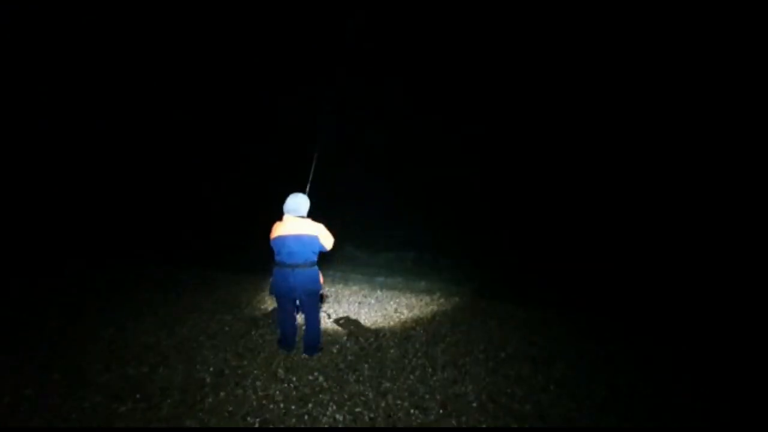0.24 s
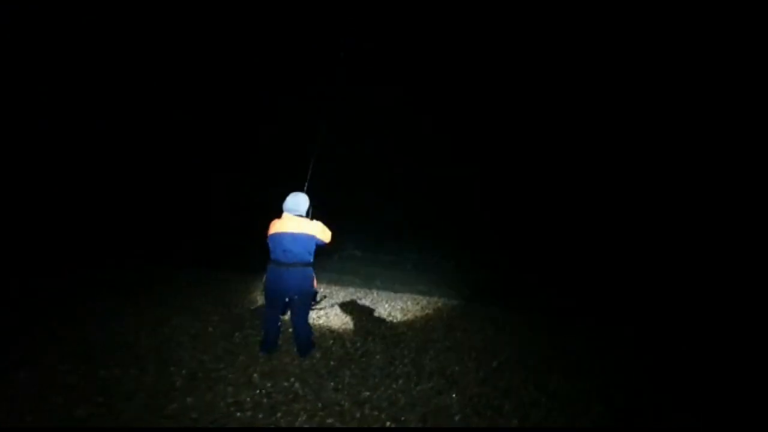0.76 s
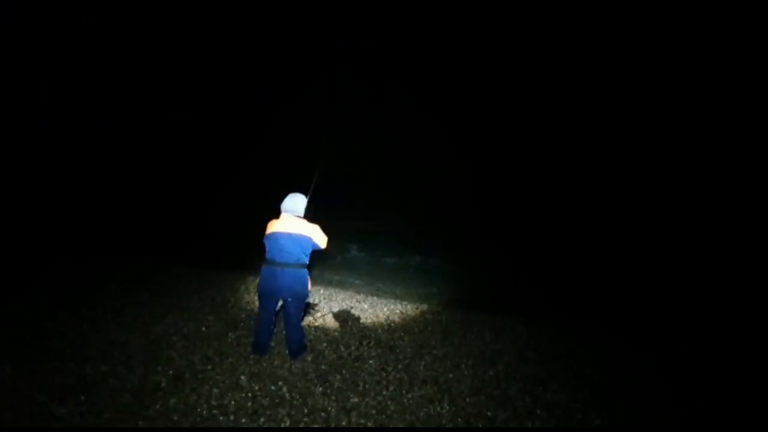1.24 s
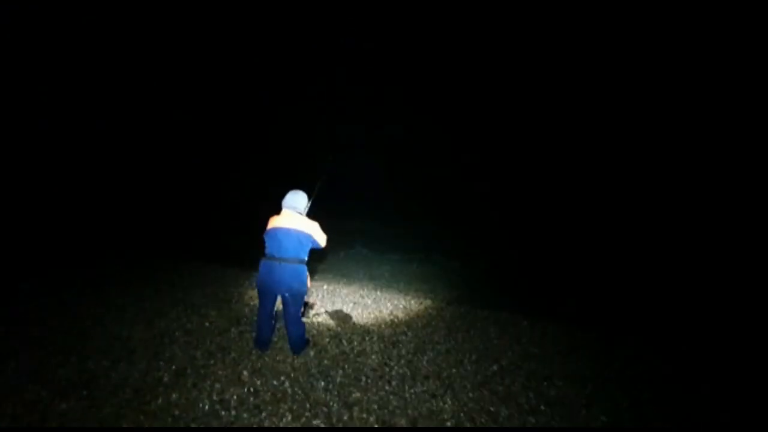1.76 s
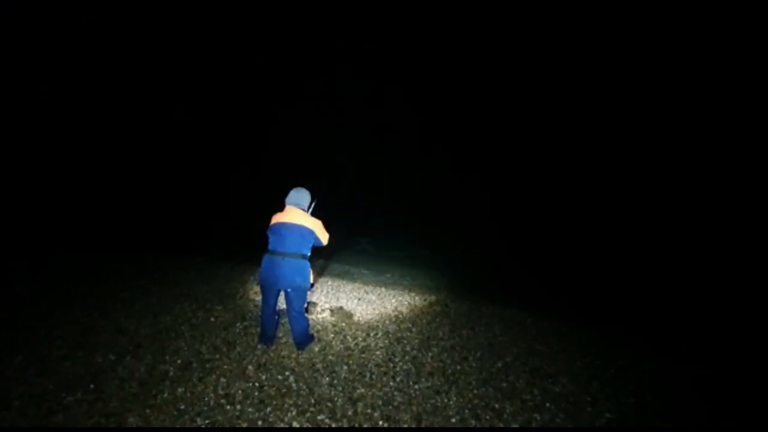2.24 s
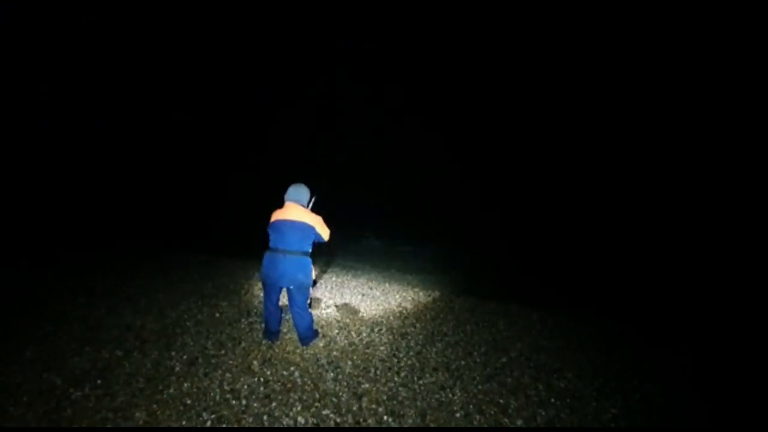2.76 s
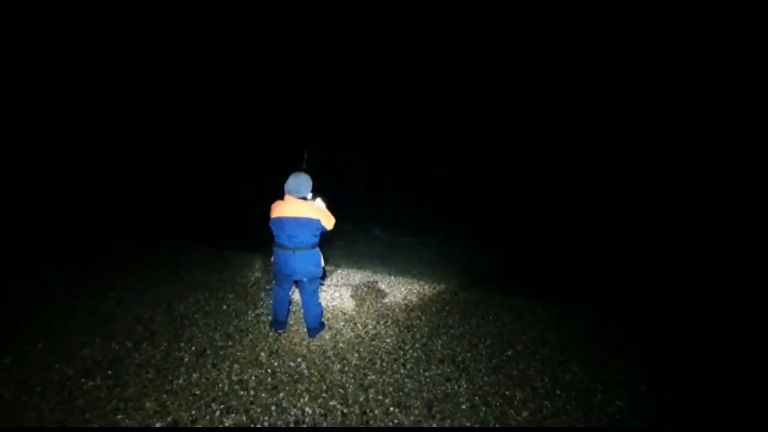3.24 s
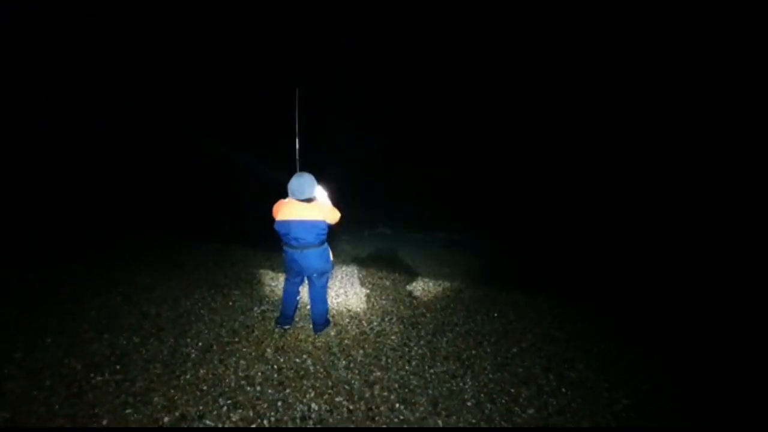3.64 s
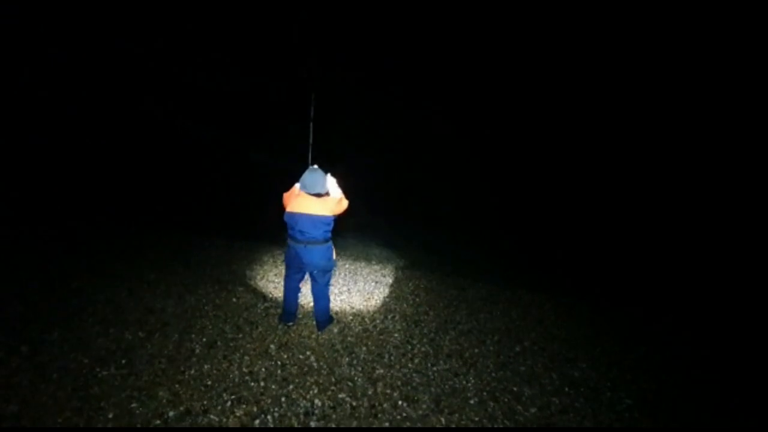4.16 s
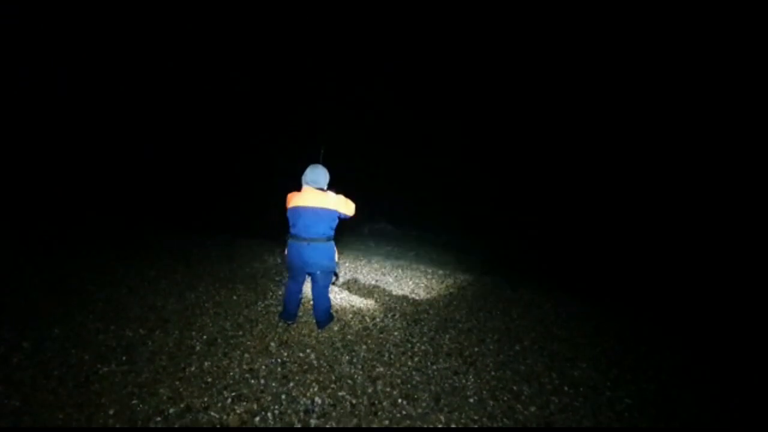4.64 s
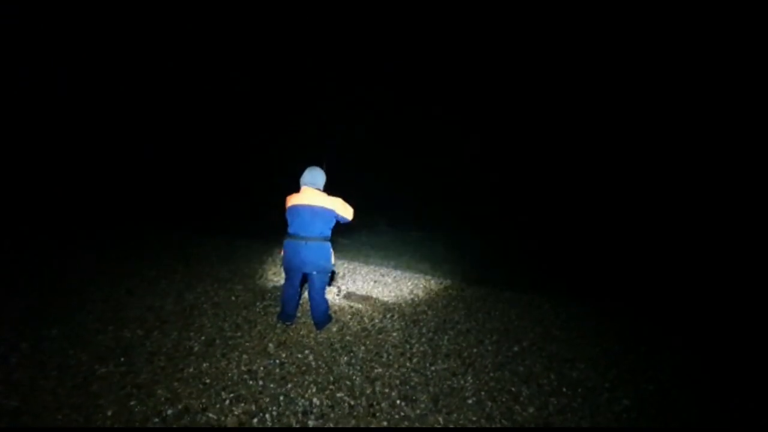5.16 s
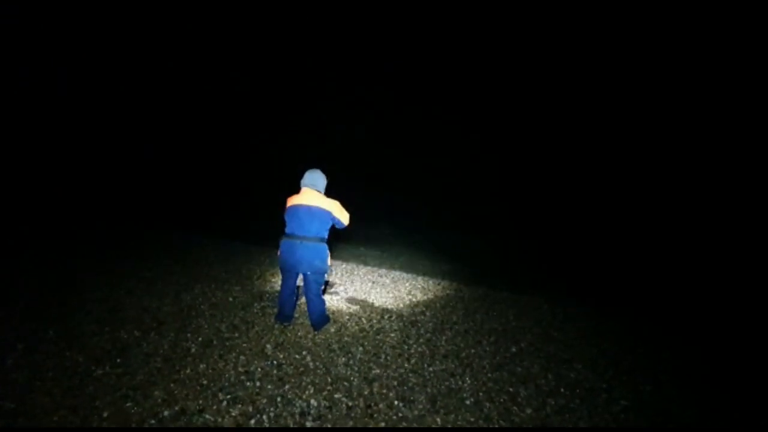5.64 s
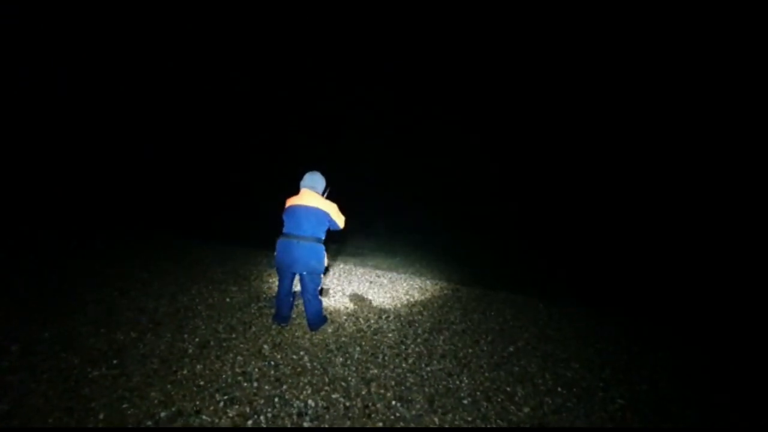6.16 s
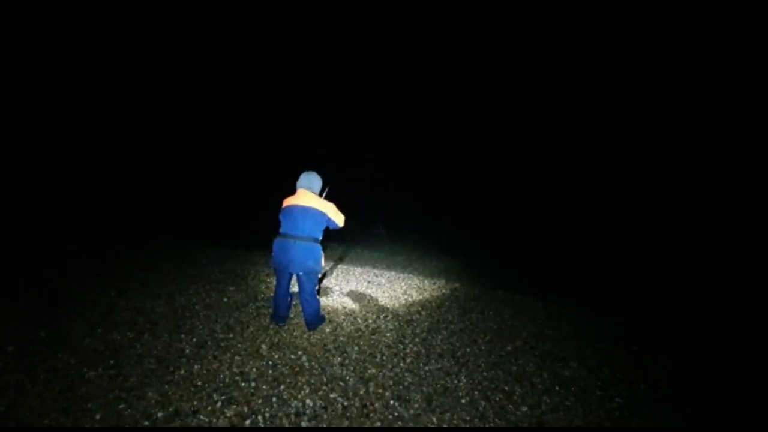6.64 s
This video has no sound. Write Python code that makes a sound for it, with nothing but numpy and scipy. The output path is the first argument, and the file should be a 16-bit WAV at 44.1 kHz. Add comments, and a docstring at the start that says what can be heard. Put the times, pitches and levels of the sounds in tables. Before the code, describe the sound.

Waves break and drain on a pebble beach, after a waterproof sleeve rustles against the microphone and wind gusts buffet it.

```python
"""Waves break here and there along a shingle beach at night, run up the pebbles and drain back.
Turbulent water roars and splashes, colliding stones rattle, foam fizzes and trapped air booms.
At first a waterproof sleeve rubs and crackles on the camera by stick-slip friction, and the camera
body is knocked once; then gusts of wind buffet it. Two microphone ports, each with its own
resonances, hear the surf with a time lag that follows the break along the shore."""
import sys
import numpy as np
from scipy import signal
from scipy.fft import rfft, irfft, next_fast_len
from scipy.io import wavfile
from scipy.ndimage import uniform_filter1d

SR = 44100
rng = np.random.default_rng(int(sys.argv[2]) if len(sys.argv) > 2 else 0)


def digitize_waveform(pressure):
    """Quantize a signal to 16-bit integers and store it at the path in sys.argv[1].

    Rows of a 2-D input are taken as channels; values are limited to [-1, 1].
    """
    field = np.atleast_2d(pressure).T
    bounded = np.clip(field, -1, 1)
    quanta = np.round(bounded * 32767).astype(np.int16)
    wavfile.write(sys.argv[1], SR, quanta)


N = 304290
T = np.arange(N) / SR
PORT_LAG_S = 0.00049  # delay between the ports for a sound fully to one side
BANK_BEARING = -0.88  # the pebble bank that the water drains through

# Where the wave breaks. Each row: time in seconds, bearing (-1 left, 1 right), spread in bearing.
BREAK_PATH = [(1.5, 0.54, 0.43), (2.3, 0.87, 0.28), (3.8, 0.98, 0.19), (4.1, -.92, 0.45),
              (4.68, -0.75, 0.51), (4.92, -0.13, 0.56), (5.4, -0.52, 0.2), (6.25, -0.48, 0.21),
              (6.42, 0.99, .26)]
# Spectra of the four surf layers. Each row: frequency in Hz, relative spectral density in dB.
ROAR_SPECTRUM = [(30, -15), (70, -1.5), (115, -7), (190, -0.5), (300, 0.5), (450, -2), (700, -1.5),
                 (1000, -21), (2000, -34)]
SPLASH_SPECTRUM = [(500, -9.5), (850, -3), (1050, -0.5), (1350, 2.5), (1700, -5), (3000, -20), (6000, -43)]
PEBBLE_SPECTRUM = [(1000, -26), (1600, -4.5), (2000, 4), (2500, 0), (3300, -1.5), (5000, -8.5),
                   (7000, -13.5), (14000, -44)]
FIZZ_SPECTRUM = [(1500, -0.5), (3000, 0), (4500, 2), (6500, 1.5), (9000, -2), (12000, -1), (16000, 0.5)]

def surf():
    """Turbulence, colliding stones and bursting bubbles: many random events sum to broadband noise."""
    roar_db, splash_db, pebble_db, fizz_db = wave_levels()
    bearing, spread = curves(BREAK_PATH)
    # the deep roar comes from a wider stretch than the splash
    breaker = shore(0.84 * bearing, 1.85 * spread, far_db=-5.5, churn_db=3, churn_hz=14)
    roar = unit(colour(breaker, ROAR_SPECTRUM)) * undb(roar_db)
    swash = shore(bearing, spread, far_db=-11, churn_db=1, churn_hz=22)
    splash = unit(colour(swash, SPLASH_SPECTRUM)) * undb(splash_db)
    stones = shore(bearing, 0.63, far_db=-9, churn_db=2, churn_hz=35)
    stones += grains(per_s=2500, spread_db=3)  # near stones click singly
    pebbles = unit(colour(stones, PEBBLE_SPECTRUM)) * undb(pebble_db)
    bubbles = shore(BANK_BEARING, 0.1, far_db=-8, churn_db=5.5, churn_hz=36)
    bubbles += undb(0.5) * grains(per_s=7000, spread_db=3)
    foam = unit(colour(bubbles, FIZZ_SPECTRUM)) * undb(fizz_db)
    shield_db = np.interp(T, [1.56, 1.68], [-8, 0])  # the sleeve covers the ports, then slides off
    return undb(shield_db) * (roar + splash + pebbles + foam)


# Breaking waves. Each row: crest time in seconds, run-up length in seconds, build rate in dB per
# second, then the levels of roar, splash, pebbles and fizz in dB.
WAVES = [(1.67, 0.11, 57, -46.5, -43, -44.5, -43.5), (1.996, 0.33, 32, -53, -57, -48.3, -50),
         (2.604, 0.28, 33, -50.5, -55.5, -53, -58), (3.04, 0.32, 33, -46.5, -50.5, -54.5, -60),
         (4.16, 0.47, 42, -45, -47.5, -53, -48), (4.557, 0.12, 58, -44, -48, -49, -46),
         (4.836, 0.5, 107, -42.5, -40, -42, -39), (5.76, 0.09, 53, -47, -44.5, -48.5, -41.5),
         (6.4, 0.13, 294, -51, -53.5, -54, -47), (6.66, 0.096, 43, -48, -45.5, -44.5, -57)]
# The steady far surf: levels of roar, splash, pebbles and fizz in dB.
FAR_SURF_DB = (-53, -56, -55.5, -58.5)

def wave_levels():
    """Exponential growth and decay: each wave swells over the far surf. Gives four levels in dB."""
    crests, lengths, builds, *layers = np.transpose(WAVES)
    water, foam = [], []
    for crest, length, build in zip(crests, lengths, builds):
        water.append(swell(crest, length, build, fall_db_s=19, sag_db_s=4))
        # foam gathers more slowly than the water breaks, and bursts sooner
        foam.append(swell(crest, length, 0.35 * build, fall_db_s=31, sag_db_s=4))
    return [power_sum(far_db, peaks_db, shapes)
            for far_db, peaks_db, shapes in zip(FAR_SURF_DB, layers, (water, water, water, foam))]


def shore(bearing, spread, far_db, churn_db, churn_hz, stretches=7):
    """An incoherent line source: each stretch churns alone, and its path difference sets its lag."""
    out, power = np.zeros((2, N)), 0
    angles = np.pi * ((np.arange(stretches) + 0.5) / stretches - 0.5)
    for place in np.sin(angles):
        far_ends = undb(far_db) * place ** 4  # the rest of the long beach crowds into the two ends
        weight = np.exp(-((place - bearing) / spread) ** 2) + far_ends
        water = weight * undb(churn_db * walk(churn_hz)) * rng.standard_normal(N)
        out += arrive_from(place, water)
        power = power + weight ** 2
    return unit(out / np.sqrt(power))


# Air pockets under curling waves. Each row: peak time in seconds, level in dB, half length in
# seconds, pitch in Hz.
AIR_POCKETS = [(2.356, -45, 0.016, 230), (2.417, -46.5, 0.023, 290), (2.55, -45, 0.027, 291),
               (4.827, -43.5, 0.034, 298.4), (6.402, -46, 0.011, 222.4)]

def plunges():
    """Bubble resonance: each trapped air pocket pulsates in a short boom of wavering pitch."""
    out = np.zeros(N)
    for peak_s, db, half_s, hz in AIR_POCKETS:
        pitch_hz = hz * (1 + 0.11 * walk(60))
        phase = 2 * np.pi * np.cumsum(pitch_hz) / SR
        envelope = np.exp(-0.5 * ((T - peak_s) / half_s) ** 2)
        out += undb(db) * np.sqrt(2) * np.sin(phase) * envelope
    return out


# Water sucking back through the stones. Each row: time in seconds, level in dB.
BACKWASH_LEVELS = [(1.9, -59), (3.7, -60), (4.3, -53), (5.2, -75), (6.33, -66), (6.46, -50), (6.7, -45),
                   (6.9, -42)]
# Its hollow ring. Each row: frequency in Hz, relative spectral density in dB.
BACKWASH_SPECTRUM = [(1200, -26), (1700, -5), (1880, -1.5), (2080, -1), (2300, -22), (2900, -8),
                     (4000, -35)]

def backwash():
    """Impact noise: draining water drags stones of like size, so the rattle gathers round one pitch."""
    level_db, = curves(BACKWASH_LEVELS)
    impacts = grains(per_s=5000, spread_db=-1.5, channels=1)[0]
    rattle = unit(colour(impacts, BACKWASH_SPECTRUM)) * undb(level_db)
    return arrive_from(BANK_BEARING, rattle)


# Spectra of the three sleeve layers. Each row: frequency in Hz, relative spectral density in dB.
RUB_SPECTRUM = [(40, -18), (150, -6), (350, -3), (600, -3.5), (1100, -8), (1800, -9.5), (3000, -1),
                (6000, -18)]
SWISH_SPECTRUM = [(1000, -31), (2000, -11), (3000, -1), (4000, -3.5), (5000, -6), (7000, -9),
                  (14000, -56.5)]
HISS_SPECTRUM = [(3000, -26), (6000, 0.5), (8000, 4.5), (10000, 3), (13000, -0.5), (16000, -0.5)]

def sleeve():
    """Stick-slip friction: the body carries the rub to both ports, and each hears its own threads."""
    rub_db, swish_db, hiss_db = stroke_levels()
    contact = np.interp(T, [1.62, 1.85], [1, 0])
    catch = walk(110)
    rub = unit(colour(rng.standard_normal(N), RUB_SPECTRUM)) * undb(rub_db + 1.23 * catch)
    # fast sliding blends into a swish; as it slows, single crinkles stand out
    slowness = np.clip((-28.5 - swish_db) / 18, 0.1, 0.9)
    threads = grains(per_s=16000, spread_db=1) * np.sqrt(1 - slowness)
    threads += crinkles(per_s=690, spread_db=2.5, decay_s=0.00091) * np.sqrt(slowness)
    through_body = 0.24 * rng.standard_normal(N)
    swish = unit(colour(threads + through_body, SWISH_SPECTRUM)) * undb(swish_db + 1.25 * catch)
    hiss = unit(colour(threads, HISS_SPECTRUM)) * undb(hiss_db + 2 * catch)
    return contact * (rub + swish + hiss)


# Strokes of the sleeve. Each row: start and length in seconds, then rub, swish and hiss levels in dB.
STROKES = [(0.0, 0.098, -29.5, -23, -26.5), (0.123, 0.028, -27, -22, -22.5),
           (0.304, 0.022, -39, -44, -26.5), (0.403, 0.029, -39, -28.5, -22.5),
           (0.484, .015, -41, -42, -28.5), (0.543, 0.12, -35.5, -35.5, -41), (0.737, 0.17, -32, -32.2, -35),
           (.955, 0.052, -40.5, -41.5, -36.5), (1.067, 0.05, -44.5, -38.5, -31),
           (1.159, 0.13, -41.5, -43, -38), (1.63, 0.059, -43, -42.5, -40)]

def stroke_levels(creep_db=(-34.5, -33, -30.5), settle_db_s=8.5):
    """Relaxation: rub, swish and hiss, in dB, jump with each stroke over the cloth's fading creep."""
    starts, lengths, *layers = np.transpose(STROKES)
    shapes = [swell(s, length, rise_db_s=245, fall_db_s=335) for s, length in zip(starts, lengths)]
    return [power_sum(first_db - settle_db_s * T, peaks_db, shapes)
            for first_db, peaks_db in zip(creep_db, layers)]


def crinkles(per_s, spread_db, decay_s):
    """Each crease that gives way releases elastic energy as an exponentially decaying noise burst."""
    releases = grains(per_s, spread_db, channels=1) ** 2
    energy = signal.lfilter([1], [1, -np.exp(-1 / (decay_s * SR))], releases)
    return unit(np.sqrt(energy) * rng.standard_normal((2, N)))


# Snapping creases and small ticks. Each row: start in seconds, peak level in dB, left minus right
# in dB, centre frequency in Hz.
SNAPS = [(.2957, -12, -3, 11000), (0.33, -11, .5, 5000), (0.415, -11, 2, 13000), (.993, -5.5, 2, 12100),
         (1.0947, -9, 8, 12000), (1.099, -13, 10, 10000), (1.185, -15, 7, 9000), (1.208, -18.5, 12, 3580),
         (1.225, -18, 2, 9000), (1.2655, -13, 1, 10500), (1.293, -17, 10, 7000), (1.341, -22, 19, 4000),
         (1.3747, -18, 6, 3760), (1.424, -17, -5, 12000), (1.433, -9.5, 12, 3600), (1.4555, -28, 1, 8000),
         (1.4822, -20, 3, 4500), (1.4873, -12.5, 0, 12200), (1.528, -11.5, 0, 9800),
         (1.6172, -14, -7, 7500), (1.8362, -9.5, -3, 9600), (1.935, -17.5, -1.5, 8000),
         (3.552, -37, -5, 10000), (4.134, -29, -11, 10000), (5.735, -27.5, 0, 10000)]

def snaps(rise_s=0.00033, decay_s=0.00058, tail_s=0.0031, tail_db=-19, octaves=0.76, size=1024):
    """Buckling: a crease snaps with a sharp crack and a short tail, in a band set by its size."""
    out, t = np.zeros((2, N + size)), T[:size]
    f = frequencies(size)
    decay = np.exp(-t / decay_s) + undb(tail_db) * np.exp(-t / tail_s)
    envelope = (1 - np.exp(-t / rise_s)) * decay
    radiation = 1 / (1 + (2300 / f) ** 6)  # so small a source radiates hardly any bass
    for start_s, db, pan_db, hz in SNAPS:
        band = radiation / (1 + (np.log2(f / hz) / octaves) ** 2)
        crack = irfft(rfft(rng.standard_normal((2, size)) * envelope) * band)
        crack /= np.abs(crack).max(axis=1, keepdims=True)
        start = int(start_s * SR)
        out[:, start:start + size] += undb(db) * sides(pan_db) * crack
    return out[:, :N]


# One soft knock: peak level in dB, frequency in Hz, time to fall by 60 dB in seconds.
BODY_MODE = (-28, 1070, 0.044)

def knock(start_s=1.528):
    """A damped oscillator: the knocked camera body rings briefly in one mode."""
    db, hz, t60 = BODY_MODE
    age = np.maximum(T - start_s, 0)
    return undb(db) * np.sin(2 * np.pi * hz * age) * np.exp(-np.log(1000) * age / t60)


# Gusts. Each row: start and length in seconds, strength in dB, left minus right in dB.
GUSTS = [(0.102, 1.02, -50, -1), (1.337, 0.37, -36.5, 25), (1.67, 0.48, -37.5, 23), (2.644, 0.14, -41, -20),
         (3.14, .08, -52.5, 15), (4.05, .7, -55.5, 3), (4.9, 1.25, -51.5, -26)]
# Eddies. Each row: peak time in seconds, strength in dB, half length in seconds, left minus right in dB.
EDDIES = [(1.237, -32.5, 0.016, 22), (1.309, -29, 0.0093, 26), (1.354, -25, 0.018, 35),
          (1.418, -27.5, 0.01, 26), (1.512, -34.5, 0.024, 29), (1.703, -24, 0.023, 31),
          (1.807, -20.5, 0.026, 22), (1.854, -24.5, 0.025, 28), (1.915, -38, .025, -8),
          (1.973, -20, 0.012, 30), (2.054, -25.5, 0.021, 20), (2.146, -24.5, 0.019, 26),
          (2.645, -26, 0.0069, -36), (2.776, -34.5, 0.01, -27), (5.38, -39, 0.011, -23),
          (5.504, -34, .011, -26), (5.568, -32.5, 0.0079, -17), (5.642, -40.5, 0.015, -26),
          (6.013, -41, .02, -20), (6.137, -41.5, 0.014, -20)]
# The wind's rumble, and the filter for its deep part. Each row: frequency in Hz, relative level in dB.
BUFFET_SPECTRUM = [(20, -13), (40, -13), (55, 6.5), (75, 6.5), (130, -7.5), (235, -25), (400, -33.5),
                   (1000, -65), (3000, -80)]
DEEP_FILTER = [(80, 3), (130, -17)]

def wind(breeze_db=-67, neutral_db=-31.5, brightening=0.29):
    """Turbulent pressure shakes each port separately; gusts and eddies strike mostly the windward one."""
    power = undb(breeze_db) ** 2
    for start_s, length, db, pan_db in GUSTS:
        gust = undb(db + swell(start_s, length, rise_db_s=126, fall_db_s=101))
        power = power + (sides(pan_db) * gust) ** 2
    for peak_s, db, half_s, pan_db in EDDIES:
        power = power + (undb(db) * sides(pan_db)) ** 2 * np.exp(-((T - peak_s) / half_s) ** 2)
    strength = np.sqrt(power)
    flow = colour(rng.standard_normal((2, N)), BUFFET_SPECTRUM)
    local_power = uniform_filter1d(uniform_filter1d(flow ** 2, size=1100), size=700)
    flow /= np.sqrt(local_power)  # the flow under the gusts and eddies is even
    deep = colour(flow, DEEP_FILTER)
    upper_gain = (strength / undb(neutral_db)) ** brightening  # harder wind makes smaller eddies
    return strength * (deep + (flow - deep) * upper_gain)


def undb(db):
    """Decibels to amplitude gain."""
    return 10 ** (np.asarray(db) / 20)


def unit(x):
    """Scale to rms 1."""
    return x / np.sqrt(np.mean(x ** 2))


def curves(table):
    """Linear interpolation of each column in time."""
    times, *columns = np.transpose(table)
    return [np.interp(T, times, column) for column in columns]


def frequencies(size):
    """Fourier bin frequencies in Hz, no lower than 1."""
    return np.maximum(np.fft.rfftfreq(size, 1 / SR), 1)


def response(points, size):
    """Magnitude response through (Hz, dB) points on a logarithmic frequency axis."""
    hz, db = np.transpose(points)
    return undb(np.interp(np.log(frequencies(size)), np.log(hz), db))


def colour(x, points):
    """Zero-phase filtering by a spectrum of (Hz, dB) points."""
    size = next_fast_len(N + 2048, True)
    return irfft(rfft(x, size) * response(points, size), size)[..., :N]


def walk(rate_hz):
    """Smooth random modulation with a spread near 1."""
    knots = rng.standard_normal(4096)
    return np.interp(T * rate_hz, np.arange(len(knots)), knots)


def grains(per_s, spread_db, channels=2):
    """Shot noise: tiny impacts of random strength at random moments."""
    shape = (channels, N)
    strength = undb(spread_db * np.minimum(rng.standard_exponential(shape), 6))
    hits = rng.random(shape) < per_s / SR
    return unit(hits * strength * rng.standard_normal(shape))


def sides(pan_db):
    """Constant-power panning: a column of left and right gains."""
    gains = undb(np.array([[pan_db], [-pan_db]]) / 2)
    return gains / np.sqrt(np.mean(gains ** 2))


def arrive_from(bearing, x):
    """Path difference: sound from the right reaches the left port later, and from the left earlier."""
    return np.array([np.roll(x, int(round(bearing * PORT_LAG_S * SR))), x])


def swell(start, length, rise_db_s, fall_db_s, sag_db_s=0):
    """Exponential envelope in dB: rises to 0 at the start, sags over its length, then falls."""
    age = T - start
    rise = rise_db_s * np.minimum(age, 0)
    return rise - sag_db_s * np.clip(age, 0, length) - fall_db_s * np.maximum(age - length, 0)


def power_sum(floor_db, peaks_db, shapes_db):
    """Incoherent sounds add in power: the level in dB of a floor plus its swells."""
    swells = sum(undb(peak + shape) ** 2 for peak, shape in zip(peaks_db, shapes_db))
    return 10 * np.log10(undb(floor_db) ** 2 + swells)


def scene():
    """Superposition of the surf ahead with the cloth and wind at the camera."""
    return surf() + backwash() + plunges() + sleeve() + snaps() + knock() + wind()


def port(x, points, size=2048):
    """Cavity resonance: a port rings after the sound, as a minimum-phase filter."""
    cepstrum = irfft(np.log(response(points, size)))
    # folding the cepstrum onto positive time makes the ringing causal
    cepstrum[1:size // 2] *= 2
    cepstrum[size // 2 + 1:] = 0
    impulse_response = irfft(np.exp(rfft(cepstrum)))
    return signal.oaconvolve(x, impulse_response)[:N]


# Responses of the two microphone ports. Each row: frequency in Hz, gain in dB.
LEFT_PORT = [(1100, 1), (1400, -1), (1800, -3), (2800, -1), (5000, -2.5), (7400, -5), (8200, 0.5),
             (10500, 2), (13700, 6.5), (15300, -9.5)]
RIGHT_PORT = [(500, 1), (1050, -3.5), (1400, 0.5), (1800, 0), (2050, 0), (2350, -4), (2900, -2), (3400, 0),
              (4300, 4.5), (4850, 9.5), (5200, 2), (5550, 0.5), (6200, -12.5), (8000, -14.5), (9200, -4.5),
              (10500, -1.5), (13200, -4), (14500, -30)]

def record(dry):
    """Linear filtering: each port adds its resonances, and a steep low-pass cuts the top."""
    ports = np.array([port(dry[0], LEFT_PORT), port(dry[1], RIGHT_PORT)])
    low_pass = signal.ellip(10, 0.2, 80, 15300, fs=SR, output="sos")
    return signal.sosfilt(low_pass, ports)


dry = scene()
out = record(dry)
digitize_waveform(out)
```